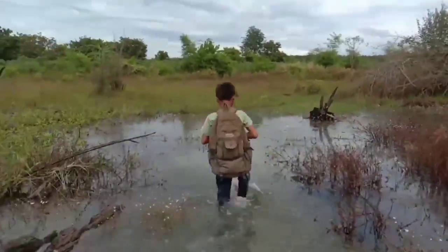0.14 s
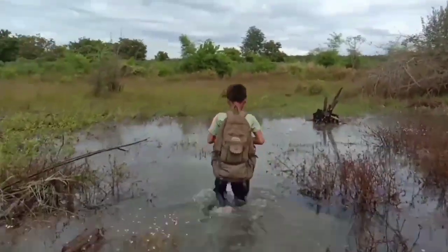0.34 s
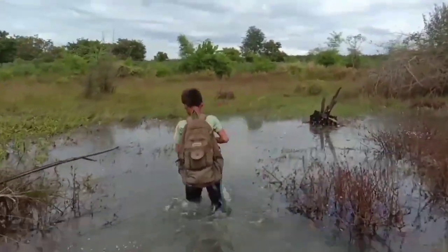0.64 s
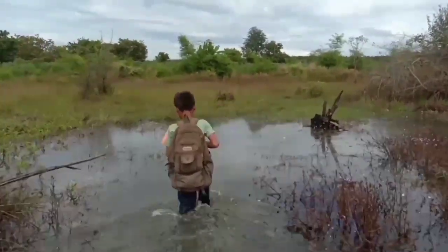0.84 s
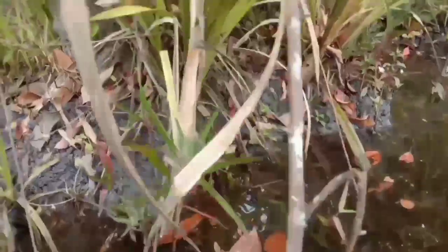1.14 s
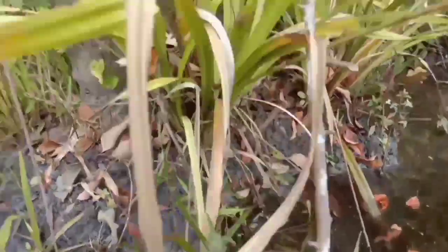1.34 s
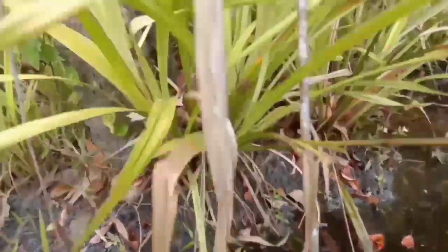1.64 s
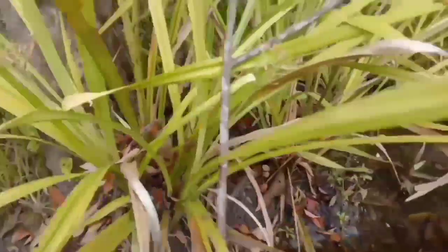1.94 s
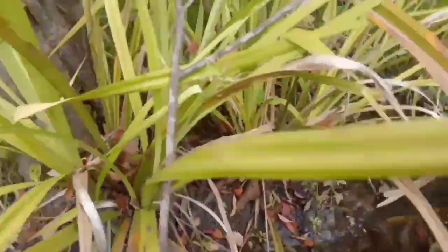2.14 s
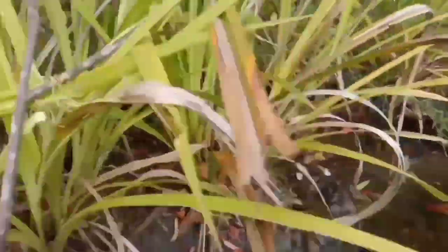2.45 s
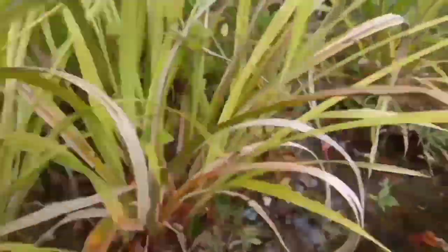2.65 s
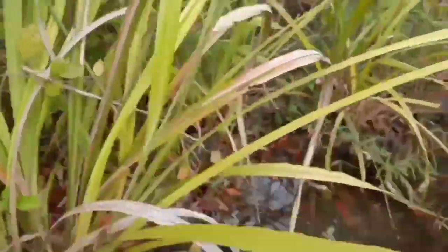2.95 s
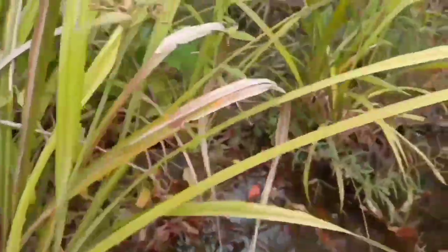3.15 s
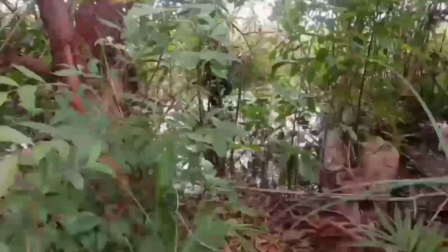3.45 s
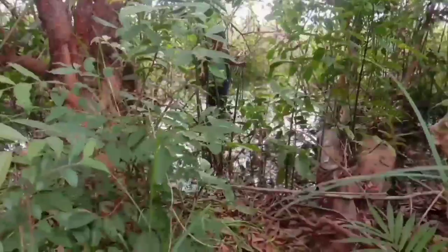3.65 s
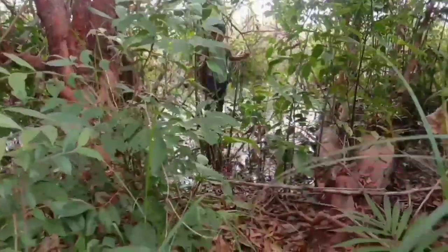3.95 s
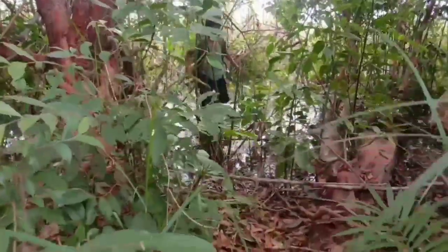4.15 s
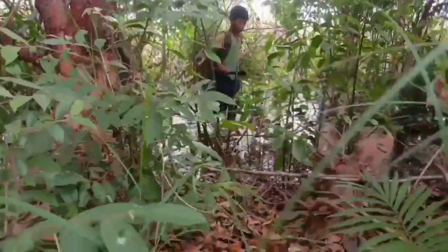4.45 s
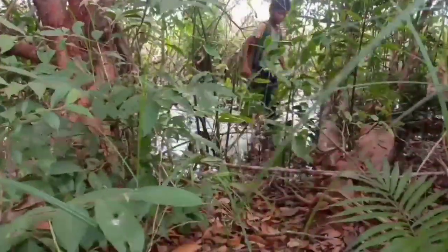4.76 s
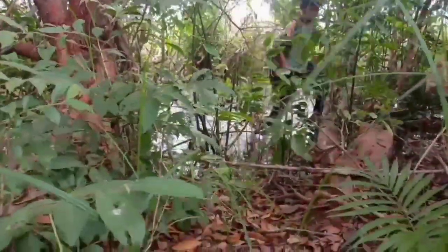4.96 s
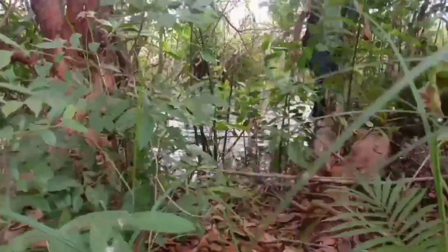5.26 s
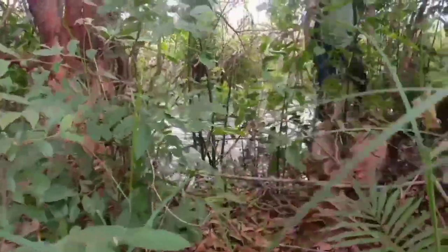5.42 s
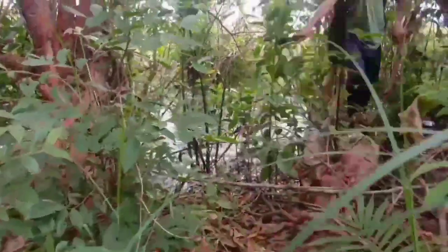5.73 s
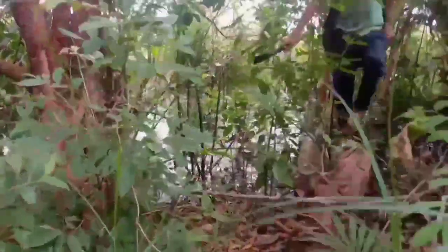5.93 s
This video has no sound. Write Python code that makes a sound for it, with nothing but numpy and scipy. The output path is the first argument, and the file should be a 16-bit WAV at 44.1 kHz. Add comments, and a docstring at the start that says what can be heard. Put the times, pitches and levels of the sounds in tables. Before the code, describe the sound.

Legs slosh loudly through shallow marsh water, then a hard cut to quiet drips and reed rustles with faint crickets, then crackling steps through dry brush.

```python
"""Legs wade close by in wind; cut to slow steps among reeds with crickets; then a walker leaves the water
through dry brush. Water and leaves are dense damped grains over fluttering noise, swelling with each movement.
Bubbles are climbing tones; slaps, splashes, snaps and thuds are short noise puffs. Crickets are pulsed noise bands,
wind is lumpy low noise. One small microphone with a ringing housing feeds both channels.
"""
import sys
import numpy as np
from scipy import signal
from scipy.fft import rfft, irfft, next_fast_len
from scipy.io import wavfile
from scipy.ndimage import uniform_filter1d, map_coordinates

SR = 44100
rng = np.random.default_rng(int(sys.argv[2]) if len(sys.argv) > 2 else 0)


def dump_mix(stems):
    """Bounce the given channels to the path in sys.argv[1] as a 16-bit WAV at rate SR."""
    frames = np.atleast_2d(stems).T  # one column per channel
    limited = np.clip(frames, -1, 1)  # hard clip at full scale
    pcm = np.round(limited * 32767).astype(np.int16)
    wavfile.write(sys.argv[1], SR, pcm)


N = 268569
CUT_S = 0.973  # the wading ends and the reeds begin
CONTROL_STEP = 32  # samples between computed swell gains


def amp(db):
    """Gain of a level in dB."""
    return 10 ** (np.asarray(db) / 20)


def unit(x):
    """x at rms 1."""
    return x / np.sqrt(np.mean(x ** 2) + 1e-20)


def wobble(rate):
    """A smooth random curve through normal deviates, rate knots a second."""
    knots = rng.standard_normal(int(N * rate / SR) + 4)
    return map_coordinates(knots, [np.arange(N) * rate / SR])


def filtered(x, response):
    """x with its spectrum multiplied by a gain that depends on frequency in Hz."""
    m = next_fast_len(x.shape[-1] + 8192)
    spectrum = rfft(x, m) * response(np.fft.rfftfreq(m, 1 / SR))
    return irfft(spectrum, m)[..., :x.shape[-1]]


def coloured(x, curve):
    """x through a filter curve of (Hz, dB) points joined on a log frequency axis, at rms 1."""
    f, db = np.transpose(curve)
    return unit(filtered(x, lambda hz: amp(np.interp(np.log(hz + 1), np.log(f + 1), db))))


def grains(low_hz, high_hz, cycles, spread_db, rise, count):
    """Scattered damped sines of random pitch and heavy-tailed size; pitch climbs by rise per lifetime."""
    when, pitch, size = rng.random((count, 3)).T
    hz = (low_hz * (high_hz / low_hz) ** pitch)[:, None]
    t = np.arange(400) / SR
    age = hz * t / cycles  # in lifetimes
    tone = np.sin(2 * np.pi * hz * t * (1 + rise * age / 2))
    wave = tone * age * np.exp(-3 * age)
    wave *= amp(-spread_db * np.log(size + 0.00063))[:, None] * np.sqrt(hz)
    where = (when * N).astype(int)[:, None] + np.arange(len(t))
    return unit(np.bincount(where.ravel(), wave.ravel(), N + len(t))[:N])


def stirred(grain, share, curve, flutter_db, rate):
    """Grains, holding this share of the power, on fluttering noise with patches of random gain."""
    z = signal.stft(rng.standard_normal(N), nperseg=256)[2]
    patches = uniform_filter1d(rng.standard_normal(z.shape), size=5, axis=0)  # across frequency
    patches = uniform_filter1d(patches, size=6, axis=1)  # across time
    bed = signal.istft(z * amp(4.2 * unit(patches)), nperseg=256)[1][:N]
    bed = bed * amp(flutter_db * wobble(rate))
    return unit(np.sqrt(share) * coloured(grain, curve) + np.sqrt(1 - share) * coloured(bed, curve))


def swells(rows):
    """Each row's gain swells to a peak and dies away, never crossing the cut after the wading."""
    swell_db, roundness = 21.5, 0.96  # drop one rise or fall time from the peak; 1 pointed, 2 round
    s, rise, fall, db = np.transpose(rows)[:4, :, None]
    t = np.arange(0, N, CONTROL_STEP) / SR
    age = np.where(t < s, (s - t) / rise, (t - s) / fall)
    same_side = (t < CUT_S) == (s < CUT_S)
    return amp(db - swell_db * age ** roundness) * same_side


def level(rows, over_db=0):
    """Gain of overlapping swells, whose powers add."""
    offsets = amp(over_db + np.zeros(len(rows)))[:, None]
    gain = np.sqrt(np.sum((swells(rows) * offsets) ** 2, axis=0))
    return np.repeat(gain, CONTROL_STEP)[:N]


def cracks(table, width, attack):
    """Each event is a decaying noise puff around its own centre; width in octaves, attack in seconds."""
    out, t = np.zeros(N + SR), np.arange(SR // 5) / SR
    for s, db, centre_hz, t60 in table:
        noise = rng.standard_normal(len(t))
        puff = filtered(noise, lambda hz: 1 / (1 + (np.log2((hz + 1) / centre_hz) / width) ** 4))
        shape = amp(-60 * t / t60) * (1 - np.exp(-t / attack))
        out[round(s * SR):][:len(t)] += amp(db - 10.5) * shape * unit(puff)
    return out[:N]


def stirring():
    """Legs churn bubbles and spray from the water and drag through leaves, with a shared unevenness."""
    # A leg dragged through water. Each row: peak in seconds, rise in s, fall in s, relative spray level in dB,
    # gurgle over spray in dB, slosh over spray in dB.
    leg_drags = [(.045, 0.094, 0.043, -37.5, -5.5, -7), (.115, 0.18, 0.12, -39.5, -5, -1),
                 (.245, 0.32, 0.16, -43.5, -4, -2.5), (.31, 0.073, 0.051, -48.5, -25, -18),
                 (.42, 0.11, 0.28, -38.5, -24, -5), (0.516, 0.11, 0.064, -37.5, 3.5, -1),
                 (.68, 0.6, 0.21, -59.5, 5.5, 7), (.77, 0.19, 0.26, -50.5, 1, 1),
                 (.9, 0.27, 0.081, -39, -8, -12.5), (.96, 0.062, .1, -36, -8, -16),
                 (1.165, 0.086, 0.074, -66, -1.5, -2), (1.211, 0.041, 0.04, -60.5, -6, 1.5),
                 (1.325, 0.044, 0.16, -56, -1.5, 3.5), (1.42, 0.11, 0.3, -57.5, -1.5, 0),
                 (1.49, .1, 0.097, -67.5, 8, -8), (1.88, 0.14, 0.9, -70.5, -4, -7),
                 (2.1, 0.023, 0.15, -61, -14, -6.5), (2.2, 0.11, 0.19, -62, -2, -1),
                 (2.325, 0.15, 0.063, -49.5, -15.5, -9), (2.39, 0.19, 0.11, -64.5, 9, 6.5),
                 (2.518, 0.067, 0.096, -62, -4, -4.5), (2.615, .05, 0.068, -69.5, 3, -20),
                 (2.71, 0.095, 0.1, -63.5, 1, -12), (2.9, 0.19, 0.15, -72, -0.5, -5),
                 (3.035, 0.29, 0.13, -65.5, -14, -34), (3.349, 0.18, 0.6, -70, -1.5, -5.5),
                 (3.425, 0.07, 0.024, -62, -14, -2), (3.505, .05, 0.027, -74, -15, -10),
                 (3.649, 0.091, 0.046, -56.5, -12.5, -8.5), (3.74, 0.074, 0.063, -62.5, -1.5, -2.5),
                 (3.795, 0.094, 0.12, -62.5, 3, 1.5), (3.875, 0.063, 0.05, -55.5, -21, -7),
                 (3.925, 0.044, 0.047, -47, -13, -9), (3.976, 0.04, 0.061, -49.5, -14, -3),
                 (4.11, 0.084, 0.027, -63.5, -15, -19), (4.16, 0.036, 0.12, -58, -9, -10.5),
                 (4.304, 0.035, 0.045, -46, -19, -15), (4.381, 0.036, 0.057, -45.5, -10.5, -7),
                 (4.486, 0.032, 0.057, -43.5, -7.5, -4), (4.625, 0.095, 0.062, -49, -15, -10),
                 (4.688, 0.021, 0.017, -47.5, 1, 2), (4.789, 0.097, 0.17, -59, -15, -5),
                 (4.885, 0.044, 0.034, -68, -27, -22), (5.073, 0.061, 0.078, -65, -10.5, 2),
                 (5.3, 0.22, 0.2, -79.5, -10, -10.5), (5.71, 0.083, 0.07, -48, -8.5, -12),
                 (5.79, 0.065, 0.067, -66.5, -8, -6), (5.908, 0.076, 0.03, -57, -6.5, -10.5),
                 (6.01, 0.17, 0.19, -57.5, -11.5, -12.5)]
    # A brush against leaves and stalks. Each row: peak in seconds, rise in s, fall in s, relative leaf level in dB,
    # fine rustle over it in dB.
    leaf_brushes = [(0.038, 0.24, 0.064, -42, -15), (0.112, 0.14, 0.86, -51.5, -18.5),
                    (0.409, 0.063, 0.16, -38, -12), (.51, 0.24, 0.042, -40.5, -7),
                    (.63, 0.14, 0.069, -55.5, -8), (.8, 0.2, 0.34, -49, -16), (.89, .1, 0.078, -43, -14),
                    (0.966, .05, .1, -44, -12), (1.214, 0.153, 0.062, -62.5, -23),
                    (1.33, 0.065, 0.37, -63, -19.5), (1.879, 0.092, 0.052, -60.5, -25),
                    (1.95, 0.035, 0.1, -64, -25), (2.2, 0.25, 0.37, -65.5, -6),
                    (2.32, 0.022, 0.017, -40.5, -6), (2.365, 0.023, 0.0166, -51.5, -5.5),
                    (2.45, 0.1, 0.033, -64, -23), (2.56, .05, 0.037, -51, -16),
                    (2.718, 0.057, 0.088, -60.5, -8), (2.895, 0.091, 0.19, -73, -1),
                    (3.02, 0.079, 0.071, -65.5, 0.5), (3.085, 0.065, 0.057, -62, -2),
                    (3.33, 0.19, .23, -69, -9), (3.664, 0.15, 0.055, -60, -11.5),
                    (3.775, 0.14, .12, -63.5, -9), (3.875, 0.061, 0.092, -56.5, -7.5),
                    (3.925, 0.06, 0.035, -48, -8.5), (3.985, 0.047, 0.072, -52, -9.5),
                    (4.09, .07, 0.33, -64.5, -3), (4.305, 0.08, .07, -50, -16),
                    (4.39, 0.058, 0.142, -50.5, -5.5), (4.501, 0.099, 0.044, -50, -12),
                    (4.62, 0.068, 0.069, -48.5, -9.5), (4.699, 0.03, 0.027, -50, -38),
                    (4.81, 0.16, 0.073, -63, -9), (4.899, .09, 0.082, -57, -8),
                    (5.09, 0.15, 0.19, -68.5, -17), (5.3, 0.36, 0.52, -81, -19),
                    (5.471, 0.044, 0.024, -59, -22), (5.635, 0.039, .1, -61.5, -12),
                    (5.711, 0.078, 0.069, -43.5, -9.5), (5.79, .08, .15, -62.5, -11),
                    (5.914, .12, 0.0487, -52.5, -12.5), (6.004, 0.067, 0.13, -48.5, -11)]
    # Filter curves of the five layers. Each row: frequency in Hz, relative gain in dB.
    gurgle_curve = [(88, -53), (150, -38.5), (220, -13), (389, -5.5), (449, 1), (1000, -4), (1300, -30.5),
                    (2200, -120)]
    slosh_curve = [(600, -20), (850, 1.5), (1250, -5.5), (1900, -0.5), (2600, -30.5)]
    spray_curve = [(880, -30), (1500, -3), (2470, 2), (3060, 3.5), (3770, 6), (4700, -1), (6000, -21.5),
                   (7800, -44), (13200, -120)]
    leaf_curve = [(2820, -27.5), (4800, -12.5), (5180, -10.5), (6100, -3.5), (8330, -9.5), (9500, -14.5),
                  (12400, -26), (20900, -120)]
    rustle_curve = [(5290, -23.5), (9000, 7.5), (10900, -8), (11800, -4.5), (14500, -12.5)]
    *_, gurgle_db, slosh_db = np.transpose(leg_drags)
    *_, rustle_db = np.transpose(leaf_brushes)

    gurgle = stirred(grains(208, 1058, 4.3, 4.4, 0.2, count=900), 0.57, gurgle_curve, 3.4, 35)
    slosh = stirred(grains(860, 2350, 6.1, 1.9, 0.031, count=1800), 0.44, slosh_curve, 4.9, 50)
    spray = stirred(grains(1600, 6000, 6.1, 2.2, 0.02, count=3500), 0.44, spray_curve, 3.9, 60)
    droplets = grains(900, 4500, 12, 2.3, 0.3, count=350)
    spray = spray + amp(-8) * droplets
    leaf = stirred(grains(4500, 10000, 2.5, 3.2, 0, count=6000), 0.36, leaf_curve, 1.7, 70)
    crackle = grains(2200, 12000, 1.5, 2.7, 0, count=1200)  # sparse dry ticks
    leaf = leaf + amp(-9.5) * crackle
    rustle = stirred(grains(11000, 17000, 2.2, 1.4, 0, count=6000), 1.0, rustle_curve, 2.6, 120)

    water = level(leg_drags, gurgle_db) * gurgle + level(leg_drags, slosh_db) * slosh
    water = water + level(leg_drags) * spray
    leaves = level(leaf_brushes) * leaf + level(leaf_brushes, rustle_db) * rustle
    uneven_motion = amp(1.82 * wobble(30) - 2.0)
    return uneven_motion * (water + leaves)


def slaps():
    """Wet slaps of legs and hands: narrow mid-frequency puffs with a slightly soft onset."""
    # Each row: start in seconds, relative level in dB, 60 dB decay time in s.
    slap_rows = [(0.0372, -27, 0.049), (0.068, -30.5, 0.042), (0.121, -23, 0.028), (0.2384, -25, 0.061),
                 (0.2836, -36, 0.061), (0.3321, -37, 0.036), (0.4578, -27, 0.045), (0.477, -29, 0.059),
                 (0.5248, -32, 0.074), (0.669, -30.5, 0.045), (0.7389, -28, 0.039), (0.7594, -31.5, 0.075),
                 (0.7886, -39, 0.057), (0.86, -41, 0.03), (0.9134, -34.5, 0.036), (0.9318, -22.5, 0.045),
                 (0.963, -28.5, 0.045), (1.167, -42, 0.048), (1.331, -52, 0.039), (1.3734, -32, 0.033),
                 (1.4276, -31.5, 0.024), (1.6093, -37.5, 0.021), (2.0442, -47, 0.037),
                 (2.347, -30.5, 0.027), (2.4213, -39, 0.028), (3.4868, -61, 0.053), (3.971, -35, 0.038),
                 (4.0994, -48.5, 0.028), (4.2955, -30, 0.038), (4.3715, -23, 0.028), (4.4601, -29, 0.056),
                 (4.6162, -37, 0.045), (4.6868, -28, 0.024), (4.7611, -41, 0.048), (4.78, -35, 0.052),
                 (5.0638, -45, 0.046), (5.693, -42, 0.067)]
    slap_hz = 1240
    return cracks([(s, db, slap_hz, t60) for s, db, t60 in slap_rows], 0.27, 0.0023)


def splashes():
    """Splashes, drips and crunches: wide, quick puffs of noise."""
    # Each row: start in seconds, relative level in dB, centre in Hz, 60 dB decay time in s.
    splash_rows = [(0.036, -21.5, 4020, 0.045), (0.0798, -49, 2190, 0.032), (0.1043, -15, 3450, 0.021),
                   (0.162, -20, 2120, 0.027), (0.245, -33, 1630, 0.04), (0.2966, -34.5, 2820, 0.07),
                   (0.3784, -31.5, 3800, 0.12), (0.4364, -23, 1730, 0.037), (0.621, -29.5, 3180, 0.061),
                   (0.7424, -34.5, 3820, 0.095), (0.8043, -30, 3770, 0.03), (0.8767, -30.5, 2720, 0.085),
                   (0.8904, -20, 1920, 0.032), (0.8956, -15, 3130, 0.03), (0.934, -23, 2390, 0.043),
                   (0.9642, -24, 3430, 0.053), (1.1974, -49, 2130, 0.057), (1.2095, -38, 3170, 0.047),
                   (1.276, -49, 3300, 0.11), (1.3027, -39.5, 2970, 0.033), (1.3357, -45, 2450, 0.04),
                   (1.3494, -40, 1690, 0.033), (1.4107, -47, 1680, 0.056), (1.5394, -50, 3720, 0.023),
                   (1.5544, -68, 3020, 0.033), (1.5923, -57, 2720, 0.031), (1.8676, -38.5, 4770, 0.048),
                   (2.077, -51.5, 3870, 0.044), (2.161, -49, 2750, 0.044), (2.2117, -46, 2030, 0.056),
                   (2.2807, -30, 1940, 0.034), (2.3098, -35, 3780, 0.064), (2.3473, -33.5, 4100, 0.029),
                   (2.3937, -29.5, 3800, 0.016), (2.5057, -56, 3880, 0.04), (2.611, -55.5, 2370, 0.04),
                   (2.6604, -56, 1660, 0.054), (2.7836, -64, 2100, 0.04), (3.3134, -48.5, 3930, 0.06),
                   (3.3566, -47.5, 2020, 0.047), (3.421, -51, 4100, 0.025), (3.4944, -46, 1800, 0.032),
                   (3.5787, -47, 2400, 0.031), (3.6334, -43.5, 1940, 0.061), (3.7354, -46.5, 2100, 0.086),
                   (3.7813, -36, 2140, 0.037), (3.8776, -41.5, 3540, 0.077), (3.9732, -39, 1940, 0.047),
                   (4.0974, -45.5, 2160, 0.036), (4.1458, -40.5, 1920, 0.047), (4.2917, -36, 3320, 0.057),
                   (4.4134, -42.5, 2400, 0.12), (4.4488, -34, 3330, 0.068), (4.486, -36, 3680, 0.04),
                   (4.566, -45.5, 3770, 0.099), (4.6126, -32, 3030, 0.048), (4.8683, -42, 3030, 0.09),
                   (4.917, -50.5, 3530, 0.037), (5.0667, -46, 3000, 0.06), (5.134, -66, 1600, 0.027),
                   (5.1736, -57, 4050, 0.048), (5.2954, -61.5, 3850, 0.054), (5.31, -61, 1680, 0.044),
                   (5.462, -49.5, 3920, 0.056), (5.6291, -39.5, 1970, 0.014), (5.696, -33.5, 3270, 0.045),
                   (5.778, -51, 4470, 0.12), (5.898, -45, 3920, 0.034), (5.986, -42.5, 3760, 0.089)]
    return amp(2.5) * cracks(splash_rows, 0.52, 0.00057)


def snaps():
    """Twigs and stalks snap: bright puffs with an almost instant attack."""
    # Each row: start in seconds, relative level in dB, centre in Hz, 60 dB decay time in s.
    snap_rows = [(0.0877, -38.5, 5330, 0.05), (0.2104, -38, 8600, 0.021), (0.3656, -36.5, 5170, 0.024),
                 (0.4723, -33.5, 5330, 0.035), (0.5711, -39, 7700, 0.027), (0.6754, -41, 7560, 0.015),
                 (0.8764, -31, 5300, 0.11), (0.9522, -32, 5750, 0.031), (1.268, -50, 6000, 0.03),
                 (1.5125, -52, 5850, 0.027), (1.7878, -57, 6110, 0.025), (1.8347, -47.5, 5860, 0.07),
                 (1.8712, -38.5, 5800, 0.026), (1.8814, -44, 6070, 0.035), (1.8954, -43, 5800, 0.028),
                 (1.9235, -50, 5840, 0.028), (1.9455, -50.5, 6100, 0.029), (1.9713, -51, 6200, 0.039),
                 (2.0852, -52.5, 7860, 0.035), (2.1824, -62, 6900, 0.027), (2.363, -42, 5470, 0.019),
                 (2.5097, -60, 6150, 0.03), (2.5586, -40, 5900, 0.039), (2.7432, -56, 5600, 0.026),
                 (2.7607, -52, 6000, 0.027), (2.8255, -63, 7650, 0.035), (2.8459, -58, 5670, 0.035),
                 (2.8734, -41, 6380, 0.021), (2.9038, -49.5, 12200, 0.027), (3.0844, -42.5, 5500, 0.02),
                 (3.1123, -56, 8490, 0.022), (3.1772, -45, 8610, 0.021), (3.2455, -53.5, 12700, 0.03),
                 (3.495, -54.5, 6340, 0.035), (3.6356, -47.5, 5790, 0.049), (3.7499, -46, 6640, 0.052),
                 (3.8726, -44.5, 6440, 0.047), (3.9729, -39.5, 5870, 0.024), (4.0771, -45.5, 7500, 0.055),
                 (4.1465, -51, 9250, 0.035), (4.2887, -37.5, 6500, 0.039), (4.3735, -37, 6030, 0.1),
                 (4.577, -48, 7360, 0.082), (4.786, -44.5, 7740, 0.038), (4.9482, -51, 8850, 0.048),
                 (5.5877, -52, 6230, 0.029), (5.6665, -41.5, 6200, 0.029), (5.697, -35.5, 6600, 0.087),
                 (5.899, -41.5, 6400, 0.035), (5.9813, -40, 6800, 0.075)]
    return amp(3.5) * cracks(snap_rows, 0.37, 0.00013)


def plops():
    """A bubble or gulp rings as one unsteady tone that climbs while it nears the surface."""
    # Each row: start in seconds, relative level in dB, starting pitch in Hz, 60 dB decay time in s,
    # pitch climb over half that decay time as a share of the starting pitch.
    bubble_rows = [(0.035, -30.5, 336, 0.043, 0.12), (0.119, -29.5, 559, 0.035, 0.28),
                   (0.172, -37.5, 482, 0.048, 0.54), (0.205, -43, 434, 0.048, 0.2),
                   (0.244, -42, 618, 0.064, 0.21), (0.363, -47.5, 880, 0.059, 0.4),
                   (0.39, -45, 823, 0.061, 0.42), (0.417, -56, 920, 0.066, 0.3),
                   (0.669, -32, 715, 0.057, 0.14), (0.743, -47.5, 820, 0.25, 0.81),
                   (0.82, -41, 792, 0.065, 0.1), (0.926, -30, 223, 0.09, 0.26),
                   (1.16, -55.5, 517, 0.091, 1.4), (1.3, -62, 386, 0.071, 0.23),
                   (1.372, -42.5, 332, 0.14, 0.78), (1.449, -43.5, 334, 0.076, 0.48),
                   (1.466, -42, 432, 0.053, 0.32), (2.276, -45, 800, 0.045, 0.52),
                   (2.309, -54, 743, 0.16, 0.3), (2.333, -46.5, 592, 0.086, 0.29),
                   (2.37, -45, 406, 0.043, 0.44), (2.42, -42.5, 533, 0.028, 0.18),
                   (2.468, -51.5, 636, 0.049, 0.2), (2.902, -59, 783, 0.082, 2.5),
                   (3.338, -56, 565, 0.055, 0.31), (3.63, -47, 780, 0.028, 0.28),
                   (3.781, -48, 310, 0.046, 0.15), (4.097, -58.5, 830, 0.04, 0.24),
                   (4.37, -37, 514, 0.033, 0.21), (4.46, -44.5, 899, 0.08, 0.94),
                   (4.487, -44, 653, 0.065, 0.1), (4.68, -39, 404, 0.026, 1.26),
                   (4.772, -51.5, 790, 0.073, 0.25), ]
    out, t = np.zeros(N + SR), np.arange(SR // 5) / SR
    for s, db, hz, t60, rise in bubble_rows:
        tone = np.sin(2 * np.pi * hz * t * (1 + rise * t / t60))
        onset = 1 - np.exp(-t * hz / 0.19)  # a fraction of a cycle
        decay = amp(db - 60 * (t / t60) ** 1.116)
        out[round(s * SR):][:len(t)] += decay * onset * tone
    unsteady = out[:N] * amp(3.5 * wobble(120))
    return filtered(unsteady, lambda hz: hz ** 4 / (hz ** 4 + 200 ** 4))  # bubbles radiate no deep bass


def thuds():
    """Feet meet firm ground: low, wide puffs of noise."""
    # Each row: start in seconds, relative level in dB.
    thud_rows = [(3.43, -52.5), (3.495, -50), (3.629, -40.5), (4.37, -63), (4.679, -58), (5.69, -43.5)]
    thud_hz, thud_t60_s = 140, 0.075
    return cracks([(s, db, thud_hz, thud_t60_s) for s, db in thud_rows], 1.0, 0.001)


def wind():
    """Gusts thump the bare microphone during the wading: lumpy low-frequency noise."""
    # Each row: peak in seconds, rise in s, fall in s, level in dB.
    gust_rows = [(0, .02, .08, -39), (.18, 0.1, .06, -38.5), (.31, 0.085, .03, -48),
                 (.41, 0.11, .04, -48.5), (.515, 0.046, .1, -44.5), (.66, 0.27, .08, -51),
                 (.78, 0.039, .2, -43.5), (.86, 0.063, .15, -34.5), (.94, 0.062, .06, -33.5)]
    # Filter curve of the buffeting. Each row: frequency in Hz, relative gain in dB.
    buffet_curve = [(12, -51.5), (20, -22.5), (38, -13), (70, -3), (98, -3.5), (124, -4), (300, -20),
                    (390, -36), (660, -120)]
    lumps = amp(3 * wobble(36))
    return level(gust_rows) * unit(lumps * coloured(rng.standard_normal(N), buffet_curve))


def noise_band(centre_hz, half_width_hz):
    """Narrow noise at rms 1, its filter at half gain half_width_hz either side of the centre."""
    noise = rng.standard_normal(N)
    return unit(filtered(noise, lambda hz: 1 / (1 + ((hz - centre_hz) / half_width_hz) ** 4)))


def crickets():
    """Among the reeds one cricket pulses steadily high up; a lower one chirps now and then."""
    # The lower cricket. Each row: middle in seconds, level in dB before its flutter, length in s.
    chirp_rows = [(1.164, -65.5, 0.038), (1.663, -70, 0.072), (3.086, -67.5, 0.055), (3.253, -67.5, 0.066),
                  (3.426, -71, 0.07)]
    t = np.arange(N) / SR
    beat = np.cos(2 * np.pi * 12.3 * (t - 1.658))  # 12.3 pulses a second
    pulses = np.clip(beat + 0.15, 0.12, 1) * (t > 1.05) * (t < 3.55)
    high = amp(-77 + 0.98 * wobble(5.9)) * pulses * noise_band(8340, 240)
    chirps = sum(amp(db) * np.exp(-(abs(t - s) / (length / 2)) ** 6.4) for s, db, length in chirp_rows)
    low = chirps * amp(3.1 * wobble(150)) * noise_band(4350, 210)
    return high + low


def air():
    """The quiet background of far marsh and microphone hiss: slowly wavering coloured noise."""
    # Filter curve. Each row: frequency in Hz, relative gain in dB.
    air_curve = [(15, -49), (30, -10), (185, -1.5), (400, -6.5), (1000, -18), (2200, -20.5), (4000, -18.5),
                 (8000, -23.5), (15000, -27.5)]
    return amp(-78.5 + 1.8 * wobble(4.8)) * coloured(rng.standard_normal(N), air_curve)


def joins_db():
    """Level change in dB: the reeds fade in after the cut, and a short dip precedes the dry brush."""
    fade_db, fade_s = -30.5, 0.12
    dip_db, dip_start_s, dip_end_s = -23, 3.547, 3.565
    t = np.arange(N) / SR
    fade = fade_db * np.clip(1 - (t - CUT_S) / fade_s, 0, 1) * (t > CUT_S)
    return fade + dip_db * (t > dip_start_s) * (t < dip_end_s)


def scene():
    """All sources summed at one microphone that feeds both channels."""
    hits = slaps() + splashes() + snaps() + thuds()
    mono = stirring() + hits + plops() + wind() + crickets() + air()
    return np.array([mono, mono])


def record(dry):
    """Housing resonances, joins, faint noise of opposite sign in the two channels, an offset, a treble limit."""
    # Microphone housing. Each row: centre in Hz, full width in Hz, gain at the centre in dB.
    housing_rows = [(1260, 130, 12), (6100, 450, 3.5), (6650, 350, -9)]
    # Filter curve of the channel noise. Each row: frequency in Hz, relative gain in dB.
    hiss_curve = [(12, -41.5), (20, 0.5), (825, -6.5), (1250, -7), (1940, -13.5), (4200, -13), (14500, -48)]
    top_hz = 14900
    wet = filtered(dry, lambda hz: amp(sum(db / (1 + (2 * (hz - c) / w) ** 2) for c, w, db in housing_rows)))
    joins = joins_db()
    side = amp(-87 + 2 * wobble(6.3)) * coloured(rng.standard_normal(N), hiss_curve)
    side = side * amp(joins / 2)  # the channel noise follows the joins by half
    wet = wet * amp(joins) + [side, -side] - 0.0002
    return filtered(wet, lambda hz: hz < top_hz)


dry = scene()
out = record(dry)
dump_mix(out)
```